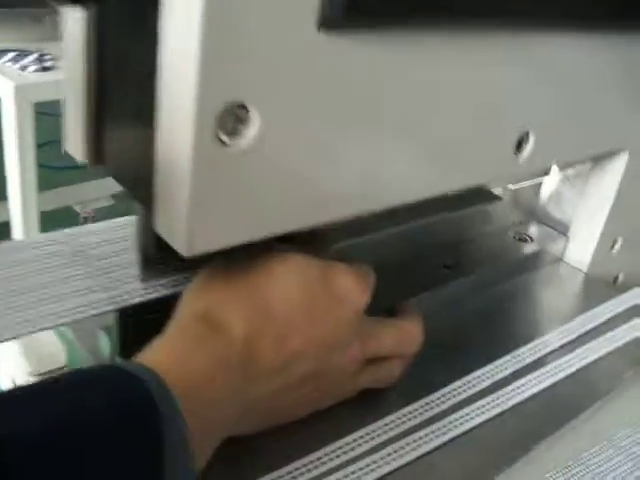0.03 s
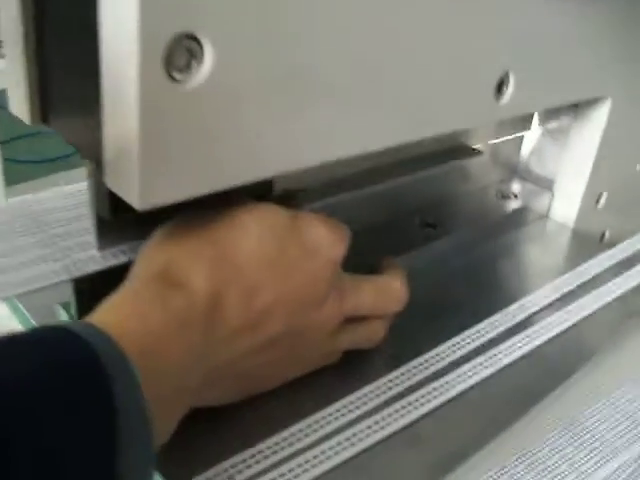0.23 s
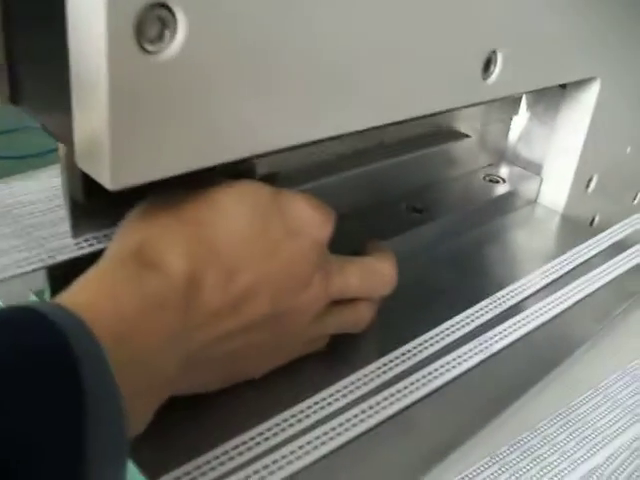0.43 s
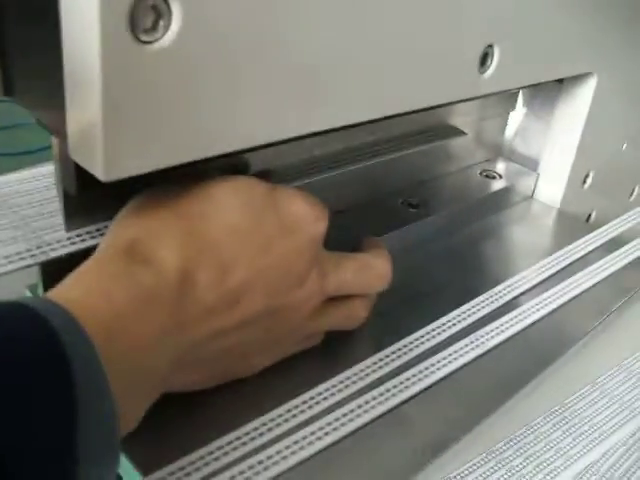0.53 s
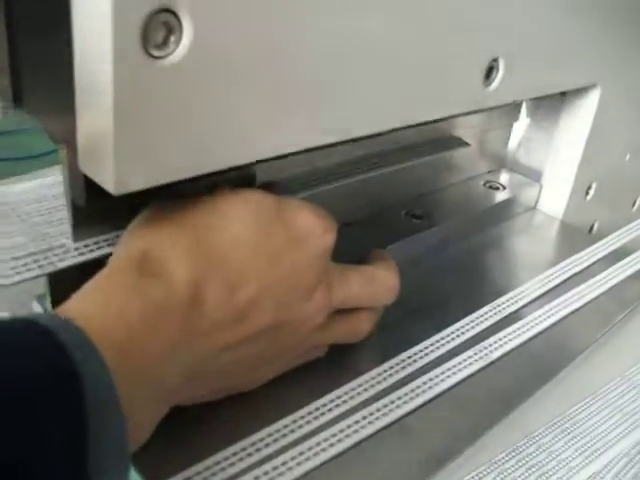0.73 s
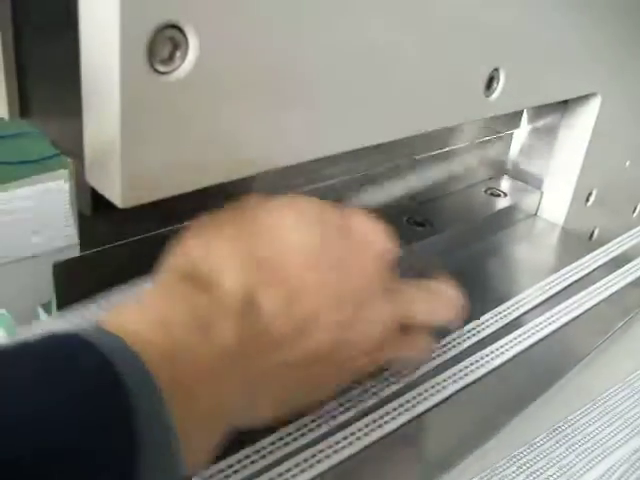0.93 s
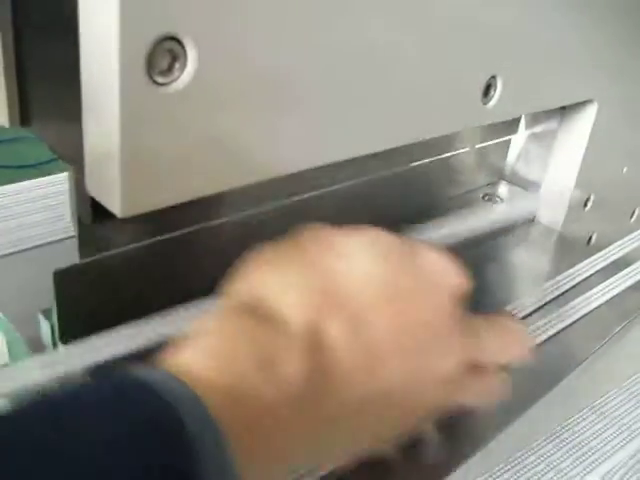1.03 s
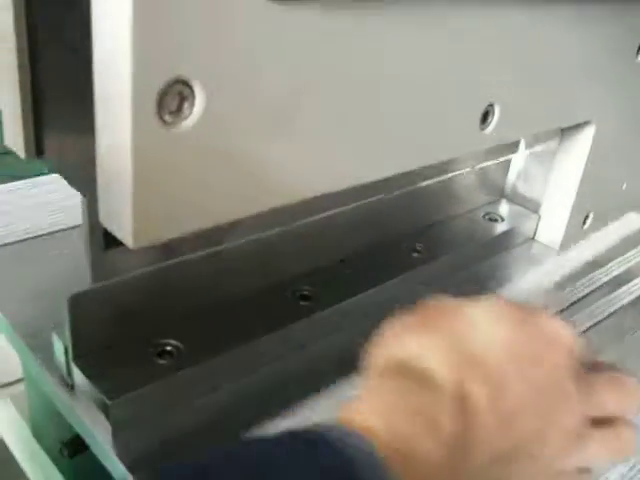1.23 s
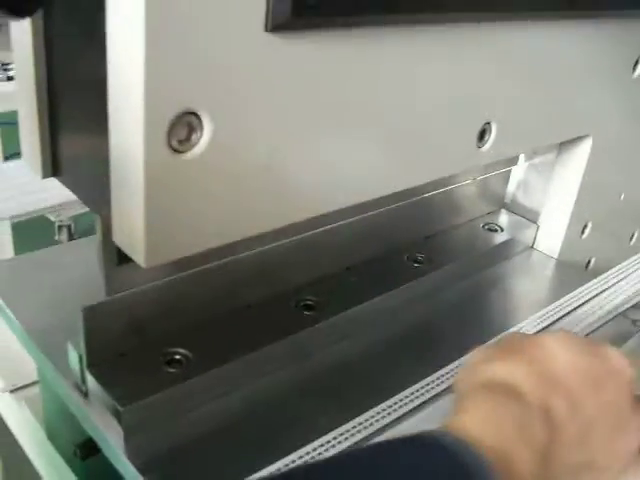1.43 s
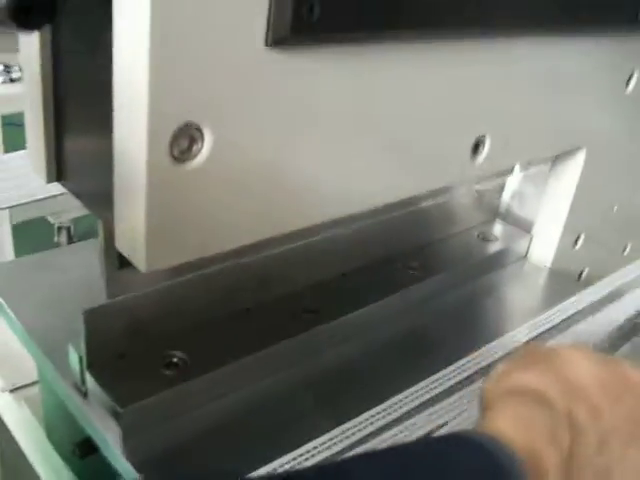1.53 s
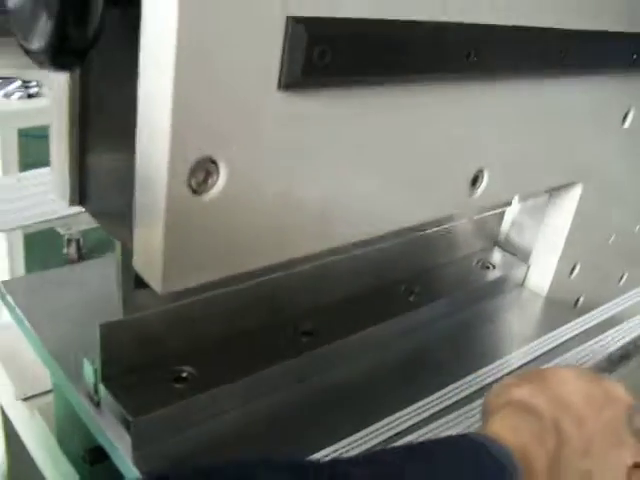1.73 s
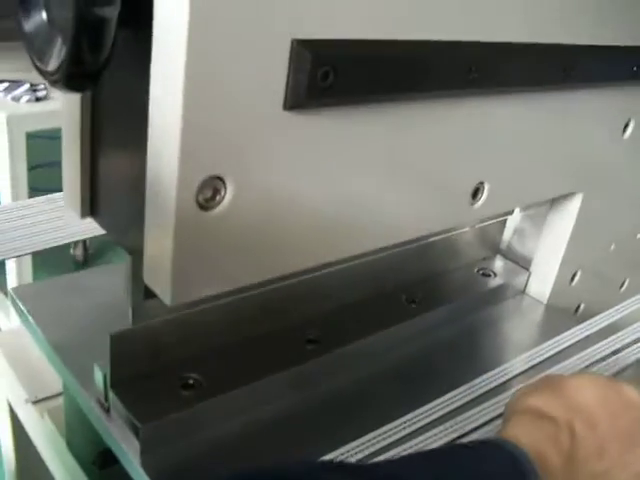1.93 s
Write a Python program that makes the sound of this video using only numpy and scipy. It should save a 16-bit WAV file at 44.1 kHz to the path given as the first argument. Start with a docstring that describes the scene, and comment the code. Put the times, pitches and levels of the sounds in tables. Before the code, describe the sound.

An air-driven cutting machine hisses and clunks twice, then a cut strip ticks on a table.

```python
"""Ventilation and a faint motor whine fill a workshop; then an air-driven blade cuts a circuit board.
A valve clicks, air hisses and the cylinder jolts the machine into its low modes. The blade crunches in,
its carriage rattles the frame and the board snaps. A second blast lifts the blade: the return latch
clicks and the carriage meets its rubber stop. A hand carries the cut strip away with a soft rumble, and
the strip ticks on the table. Impacts are damped modes and decaying noise bands, prolonged by the room."""
import sys
import numpy as np
from scipy import signal
from scipy.fft import rfft, irfft
from scipy.io import wavfile

SR = 44100
rng = np.random.default_rng(int(sys.argv[2]) if len(sys.argv) > 2 else 0)


def file_out(sig):
    """Save sig as 16-bit WAV at sys.argv[1]."""
    # one column per channel
    cols = np.atleast_2d(sig).T
    # limit, then scale
    lim = np.clip(cols, -1, 1)
    pcm = np.round(lim * 32767).astype(np.int16)
    wavfile.write(sys.argv[1], SR, pcm)


N = 88200
TIME = np.arange(N) / SR
FREQS_HZ = np.fft.rfftfreq(N, 1 / SR)


def from_db(db):
    """Amplitude ratio: tenfold for every 20 dB."""
    return 10 ** (np.asarray(db) / 20)

def since(start_s):
    """Causal time: seconds after an onset, zero before it."""
    return np.maximum(TIME - start_s, 0)

def decay(t, t60_s):
    """Exponential damping: 60 dB lost in t60_s."""
    return from_db(-60 * t / t60_s)

def unit_rms(x):
    """Normalisation to unit power."""
    return x / np.sqrt(np.mean(x ** 2) + 1e-20)

def at_hz(table, hz, column=1):
    """Interpolation of a column over log frequency."""
    table = np.array(table)
    return np.interp(np.log(hz + 1e-9), np.log(table[:, 0]), table[:, column])

def noise(spectrum):
    """Spectral shaping of white noise, rms 1."""
    colour = from_db(at_hz(spectrum, FREQS_HZ))
    return unit_rms(irfft(rfft(rng.standard_normal(N)) * colour, N))

def narrow_noise(hz, width_hz):
    """A resonance driven by noise, rms 1."""
    detuning = (FREQS_HZ - hz) / (width_hz / 2)
    return unit_rms(irfft(rfft(rng.standard_normal(N)) / (1 + detuning ** 2), N))

def drift(rate_hz):
    """Random modulation, mostly below rate_hz, rms 1."""
    return narrow_noise(0, 2 * rate_hz)

def low_pass(x, cutoff_hz):
    """Second-order roll-off: 12 dB per octave."""
    return signal.sosfilt(signal.butter(2, min(cutoff_hz, .45 * SR), fs=SR, output="sos"), x + 1e-18)

def ring(start_s, modes):
    """Modal superposition: a blow starts damped sines of alternating sign and slightly random strength."""
    t = since(start_s)
    return sum((-1) ** k * from_db(db + 1.5 * rng.normal()) * decay(t, t60) * np.sin(2 * np.pi * hz * t)
               for k, (hz, db, t60) in enumerate(modes))

def dense_ring(start_s, table, bands=20, contact_s=.001):
    """Modal overlap: countless close modes merge into noise bands, each with its own damping."""
    start, size = int(start_s * SR), N // 4
    t = since(start_s)[start:start + size]
    hz = np.fft.rfftfreq(size, 1 / SR)
    spectrum = rfft(rng.standard_normal(size)) * unit_rms(from_db(at_hz(table, hz)))
    edges_hz = np.geomspace(100, 18000, bands + 1)
    sound = np.zeros(N)
    for low, high in zip(edges_hz, edges_hz[1:]):
        band = irfft(spectrum * ((hz >= low) & (hz < high)), size)[:len(t)]
        t60_s = at_hz(table, np.sqrt(low * high), column=2)
        sound[start:start + len(t)] += band * decay(t, t60_s)
    return sound * np.minimum(since(start_s) / contact_s, 1)


# Ventilation spectrum: frequency_hz, density_db
VENTILATION = [(22, -1.5), (60, -2.5), (80, -3.5), (100, -9), (135, -8), (170, -14.5), (205, -7),
               (280, -15), (500, -17.5), (1000, -21), (2000, -26.5), (2600, -30.5), (3200, -33.5),
               (3900, -36), (7000, -42), (15500, -49.5)]
# Motor hum and whine: pitch_hz, waver_hz, level_db
MOTOR_TONES = [(145, 1.2, -58), (495, 1.2, -61), (1384, 2, -72), (2916, 2, -65.5), (3113, 3, -71)]
# Rise and fall of the motor tones: time_s, gain_db
MOTOR_SWELL = [(0, 1), (.35, 4.5), (.7, 2.5), (1.25, 3), (1.6, -2), (2.0, 1)]

def workshop():
    """Broadband ventilation noise and a narrowband whistle lie under frequency-modulated motor tones."""
    tones = 0
    for pitch_hz, waver_hz, db in MOTOR_TONES:
        phase = 2 * np.pi * np.cumsum(pitch_hz + waver_hz * drift(rate_hz=10.8)) / SR
        tones += from_db(db) * np.sqrt(2) * np.sin(phase)
    swell = from_db(np.interp(TIME, *np.transpose(MOTOR_SWELL)))
    whistle = from_db(-65) * narrow_noise(hz=3084, width_hz=320)
    return from_db(-44.5) * noise(VENTILATION) + whistle + tones * swell


# The valve spool switches: start_s, level_db
SPOOL_CLICKS = [(.2058, -39.5), (0.7536, -39.5)]
# Ring of the valve: frequency_hz, density_db, t60_s
SPOOL_RING = [(600, -8, .04), (3000, -5, 0.035), (4860, 9, 0.041), (6900, -21, 0.038), (8150, 7.5, 0.039),
              (11000, -4, 0.045), (15500, 0.5, 0.033)]

def valve():
    """Impulse excitation: the spool clicks over just before the air flows."""
    return sum(from_db(db) * dense_ring(start_s, SPOOL_RING) for start_s, db in SPOOL_CLICKS)


# Blasts of air: start_s, relative_level_db, length_s, fade_db_per_s
AIR_BLASTS = [(0.206, -30, 0.054, 23), (.7545, -29.5, 0.14, 50)]
# Broadband hiss: frequency_hz, density_db
AIR_SPECTRUM = [(250, 2.5), (900, -4.5), (1600, -12), (2500, -11.5), (5500, -12.5), (7500, -16),
                (11000, -19), (15500, -20)]
# Exhaust resonances: centre_hz, width_hz, level_db
EXHAUST_RESONANCES = [(4290, 67, -10.5), (4990, 130, -9), (5410, 750, -9.5), (6240, 400, -9.5),
                      (10500, 830, -11.5)]

def exhaust(leak_s=.02, rise_s=.0055, step_db=9.5, release_db_per_s=10 / .098, flutter_db=.5):
    """Turbulent flow noise: air leaks as the valve switches, swells as the cylinder vents, runs out."""
    hiss = noise([(100, -27)] + list(AIR_SPECTRUM))
    hiss += sum(from_db(db) * narrow_noise(hz, width_hz) for hz, width_hz, db in EXHAUST_RESONANCES)
    envelope = 0
    for start_s, db, length_s, fade_db_per_s in AIR_BLASTS:
        opening = np.minimum(since(start_s + leak_s) / rise_s, 1)
        throttle_db = step_db * (opening - 2)  # two steps down while leaking, one when open
        loss_db = fade_db_per_s * since(start_s) + release_db_per_s * since(start_s + length_s)
        envelope += (TIME > start_s) * from_db(db + throttle_db - loss_db)
    return hiss * envelope * from_db(flutter_db * drift(rate_hz=120))


# The cylinder jolts the frame: start_s, level_db
JOLTS = [(.226, -23.5), (0.417, -22), (.753, -34.5), (.7715, -24)]
# Low modes of the machine: pitch_hz, level_db, t60_s
MACHINE_MODES = [(58.6, -12, 0.053), (162, -28, 0.17), (207, -2.5, 0.15), (239.6, -5, 0.13),
                 (305, -9.5, 0.15)]

def cylinder(downstroke_s=.226, bench_hz=63, bench_db=-24.5, bench_t60_s=.1):
    """In-phase excitation: a jolt pushes all low modes the same way; the downstroke shakes the bench."""
    sound = ring(downstroke_s, [(bench_hz, bench_db, bench_t60_s)])
    for start_s, jolt_db in JOLTS:
        t = since(start_s)
        for hz, mode_db, t60_s in MACHINE_MODES:
            sound += from_db(jolt_db + mode_db) * decay(t, t60_s) * np.sin(2 * np.pi * hz * t)
    return sound


# The blade bites and its carriage knocks: start_s, frame_db, rattle_db, cutoff_hz
CARRIAGE_KNOCKS = [(.2262, -45, -28.5, 1330), (.261, -28.5, -19.5, 3890), (0.266, -29.5, -30.5, 3360),
                   (.283, -28.5, -25.5, 8140), (0.2888, -30.5, -23, 3080), (0.5548, -71, -33.5, 5100),
                   (0.561, -43.5, -40, 4000), (0.777, -49.5, -36.5, 2500), (0.808, -36, -34.5, 1580),
                   (0.85, -55, -37.5, 5180)]
# Modes of the frame: pitch_hz, level_db, t60_s
FRAME_RING = [(337.2, -8.5, 0.36), (402.4, 3.5, 0.079), (500, -10, 0.28), (531.3, -4, 0.2),
              (793, -11, 0.18), (906, -2.5, 0.09), (950, -2, 0.086), (1080, -17, 0.64), (1143, -14, 0.45),
              (1273, -10, 0.094), (1434, -4.5, 0.067), (1600, -9, 0.12), (1770, -37, 0.12),
              (2000, -12, .18)]
# Rattle of its parts: frequency_hz, density_db, t60_s
PARTS_RATTLE = [(149, -8, 0.2), (397, -2.5, 0.15), (644, -6, 0.11), (930, -2.5, 0.12), (1250, -4.5, 0.064),
                (1730, -4, 0.099), (2180, -3.5, 0.1), (3000, -18.5, 0.11), (3300, -8, 0.093),
                (6500, -18.5, 0.063), (15000, -13, 0.14)]

def carriage():
    """Impact excitation: knocks ring and rattle the frame, some dull and some brighter."""
    sound = 0
    for start_s, frame_db, rattle_db, cutoff_hz in CARRIAGE_KNOCKS:
        frame = from_db(frame_db) * ring(start_s, FRAME_RING)
        rattle = from_db(rattle_db) * dense_ring(start_s, PARTS_RATTLE)
        sound += low_pass(frame + rattle, cutoff_hz)
    return sound


# Snaps of the board, then the return latch's click: start_s, burst_db, ring_db, steel_db, cutoff_hz
SNAPS_AND_LATCH = [(0.4142, -16.5, -27, -30.5, 16000), (0.4241, -45, -33.5, -32.5, 14100),
                   (.433, -35, -31, -43, 7200), (0.4558, -24, -44, -47, 5470),
                   (0.9491, -19.5, -31.5, -41, 7700)]
# The sharp onset: frequency_hz, density_db, t60_s
SHARP_BURST = [(300, 9, 0.0095), (2500, -1.5, 0.021), (4560, -3, 0.036), (6000, 4, 0.023),
               (7300, -11, 0.011), (7920, 8, 0.013), (10500, -2, 0.022), (15500, -7, 0.024)]
# The dense ring after it: frequency_hz, density_db, t60_s
AFTER_RING = [(202, -9.5, 0.45), (840, 8, 0.13), (1640, 1, 0.16), (2500, -5, 0.28), (4950, -1, 0.097),
              (8500, -7.5, 0.12), (11900, -8, 0.15), (15500, -20, 0.16)]
# Modes of the steel blade: pitch_hz, level_db, t60_s
STEEL_MODES = [(938, -8, .18), (1530, -10, .2), (1880, -10, .14), (4730, -8, .1), (5110, -16, .12),
               (6880, -6, .08), (7040, -7, .1), (8500, -8, .05), (10850, -13, .1)]

def snaps_and_latch():
    """Free vibration after a transient: the board snaps, and later the return latch clicks metallically."""
    sound = 0
    for start_s, burst_db, ring_db, steel_db, cutoff_hz in SNAPS_AND_LATCH:
        burst = from_db(burst_db) * dense_ring(start_s, SHARP_BURST)
        ringing = from_db(ring_db) * dense_ring(start_s, AFTER_RING)
        steel = from_db(steel_db) * ring(start_s, STEEL_MODES)
        sound += low_pass(burst + ringing + steel, cutoff_hz)
    return sound


# The rising carriage meets its stop: start_s, level_db
STOP_HITS = [(.955, -29), (0.9603, -20.5)]
# Hollow ring at the stop: pitch_hz, level_db, t60_s
HOLLOW_MODES = [(327, -8.5, .08), (405, -3.5, 0.11), (518, -2.5, 0.1), (674, -16, 0.16), (810, -23, 0.099),
                (899, -13.5, .12), (950, -8.5, 0.11), (1138, -18.5, .15), (1202, -10.5, 0.092),
                (1601, -11.5, 0.067)]
# Thud of the rubber: frequency_hz, density_db, t60_s
RUBBER_THUD = [(100, -24, 0.023), (220, -9.5, 0.031), (450, -5, 0.04), (1100, -9, 0.03),
               (1800, -11.5, 0.033), (2970, -21, 0.015), (4950, -31, 0.042), (15000, -48, 0.017)]

def end_stop(thud_db=-4):
    """Cushioned impact: the rubber stop gives a dull double clunk with a hollow ring."""
    return sum(from_db(db) * (ring(s, HOLLOW_MODES) + from_db(thud_db) * dense_ring(s, RUBBER_THUD))
               for s, db in STOP_HITS)


# Swell of the hand's rumble: time_s, level_db
RUMBLE_LEVEL = [(1.2, -75), (1.35, -53), (1.65, -44), (1.8, -48.5), (1.95, -66)]
# Its spectrum: frequency_hz, density_db
RUMBLE_SPECTRUM = [(20, -2), (48, -1), (80, -11.5), (220, -18.5), (600, -41), (4000, -74)]

def handling():
    """Amplitude-modulated noise: a low rumble swells and fades as the hand carries the strip away."""
    return noise(RUMBLE_SPECTRUM) * from_db(np.interp(TIME, *np.transpose(RUMBLE_LEVEL)))


# The cut strip touches down and bounces: start_s, level_db
STRIP_TICKS = [(1.6826, -34), (1.691, -47), (1.7467, -40.5), (1.753, -52), (1.784, -43), (1.791, -54),
               (1.806, -61), (1.967, -62)]
# Noise of a tick: frequency_hz, density_db, t60_s
TICK_BURST = [(100, -25, .03), (1500, -29, 0.034), (4500, -15, 0.051), (7000, -8.5, .025), (9500, -6, .022),
              (11200, 0, 0.02), (14000, -1, 0.022), (16000, -15, 0.02)]
# Modes of the strip: pitch_hz, level_db, t60_s
STRIP_RING = [(10250, -13, .025), (11550, -7, .022), (14030, -7, .028)]
# Its soft raps on the table: start_s, level_db
TABLE_RAPS = [(1.684, -49), (1.748, -52)]
# Modes of the table: pitch_hz, level_db, t60_s
TABLE_RING = [(876, 1.5, 0.15), (1460, 0, .12), (2060, -3, 0.094)]

def strip():
    """A collision excites both bodies: the strip ticks brightly over a faint ring of the table."""
    ticks = sum(from_db(db) * (dense_ring(s, TICK_BURST) + ring(s, STRIP_RING)) for s, db in STRIP_TICKS)
    return ticks + sum(from_db(db) * ring(s, TABLE_RING) for s, db in TABLE_RAPS)


def room(x, level_db=-15.5, delay_s=.012, t60_s=.72, bright_db=-6, bright_t60_s=.52):
    """Diffuse reverberation: convolution with a noise tail whose treble dies sooner."""
    dark = low_pass(rng.standard_normal(N), cutoff_hz=6400) * decay(TIME, t60_s)
    bright = from_db(bright_db) * rng.standard_normal(N) * decay(TIME, bright_t60_s)
    tail = (dark + bright) * (TIME > delay_s)
    return from_db(level_db) * signal.fftconvolve(x, tail / np.sqrt(np.sum(tail ** 2)))[:N]

def scene():
    """Direct and reverberant sound add; the strip lies nearer than the machine and sounds drier."""
    machine = valve() + cylinder() + carriage() + snaps_and_latch() + end_stop()
    ticks = strip()
    reverberation = room(machine + from_db(-5) * ticks)
    return (machine + ticks + reverberation + exhaust() + workshop() + handling())[None]

def record(dry, low_cut_hz=5.4, high_cut_hz=15750):
    """Band limiting: the deepest bass is thinned and the top is cut steeply."""
    thinned = signal.sosfilt(signal.butter(1, low_cut_hz, "high", fs=SR, output="sos"), dry)
    return signal.sosfilt(signal.ellip(12, .1, 90, high_cut_hz, fs=SR, output="sos"), thinned)


dry = scene()
out = record(dry)
file_out(out)
```